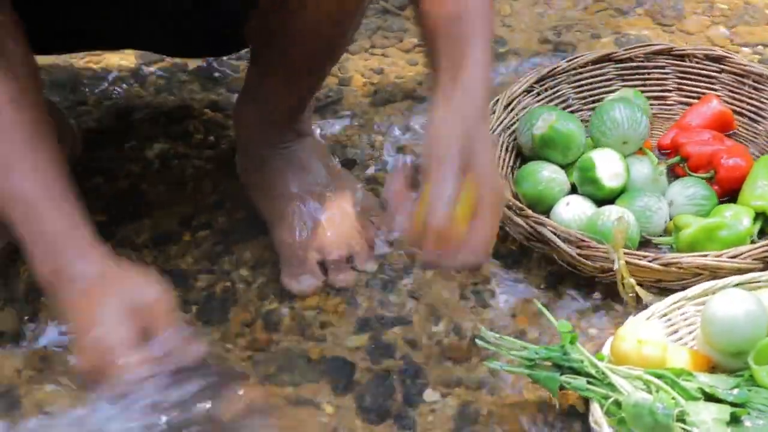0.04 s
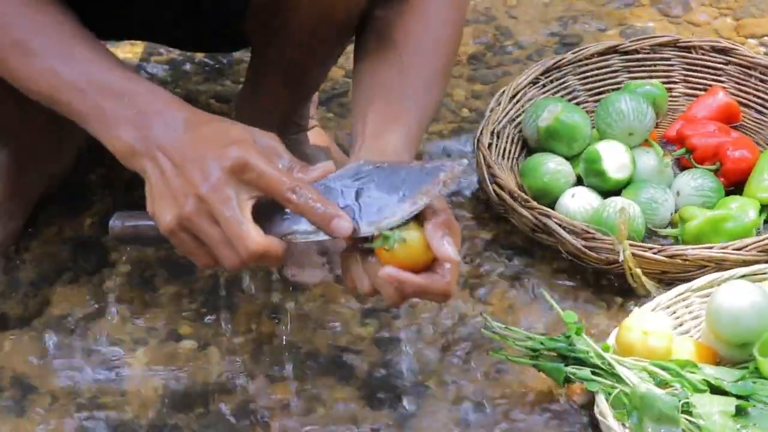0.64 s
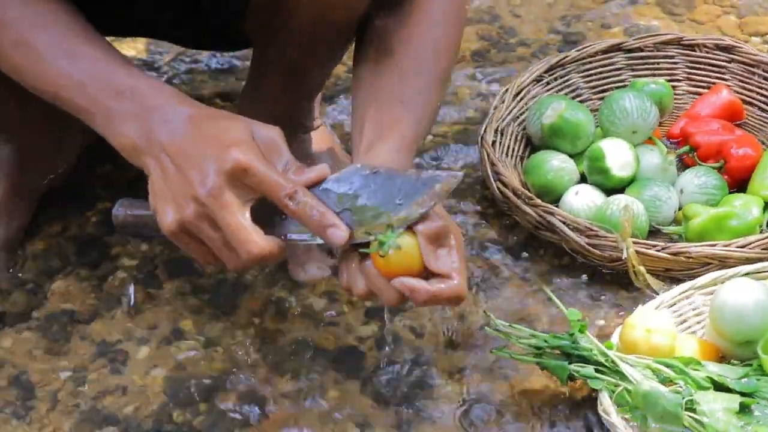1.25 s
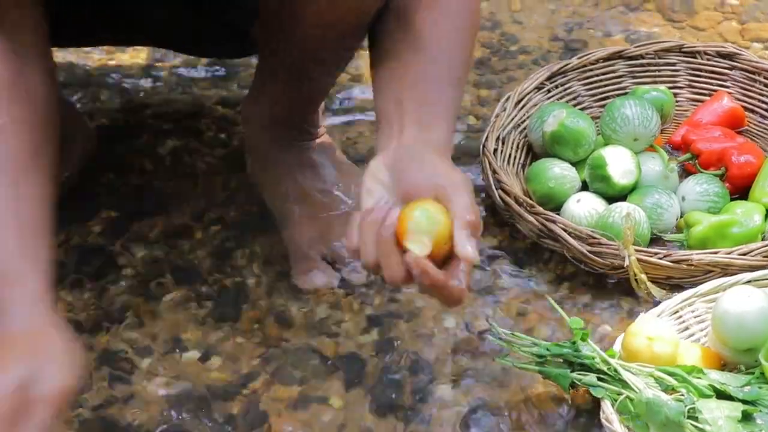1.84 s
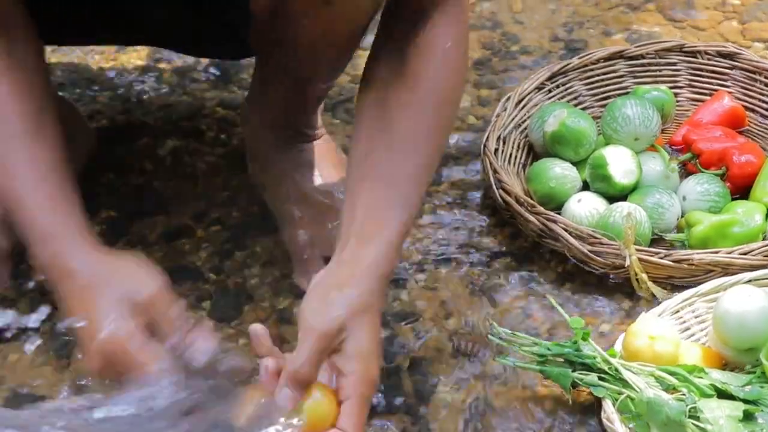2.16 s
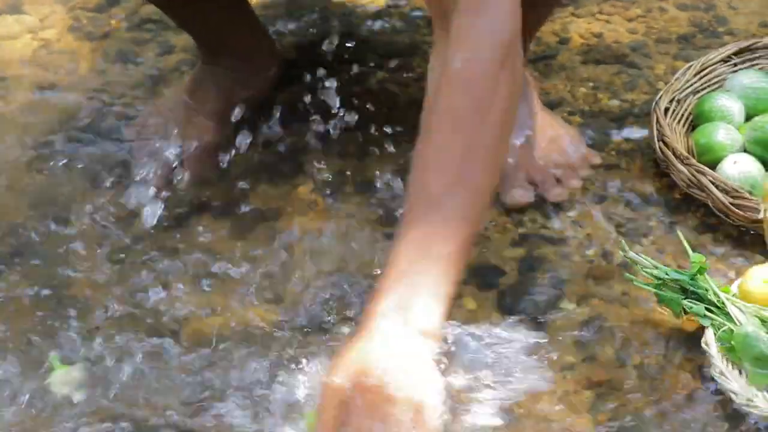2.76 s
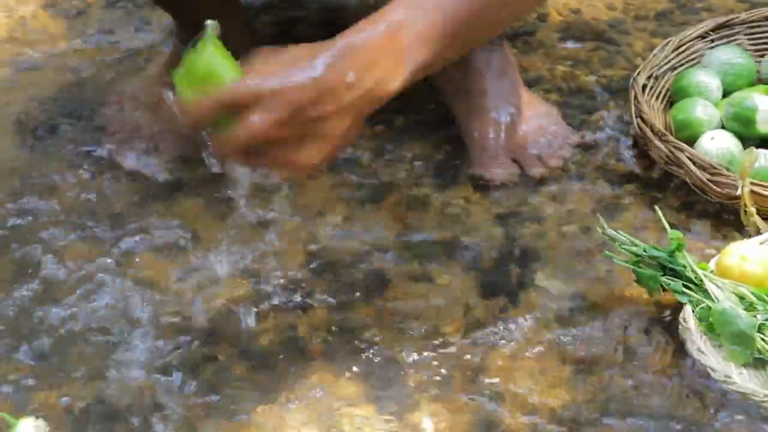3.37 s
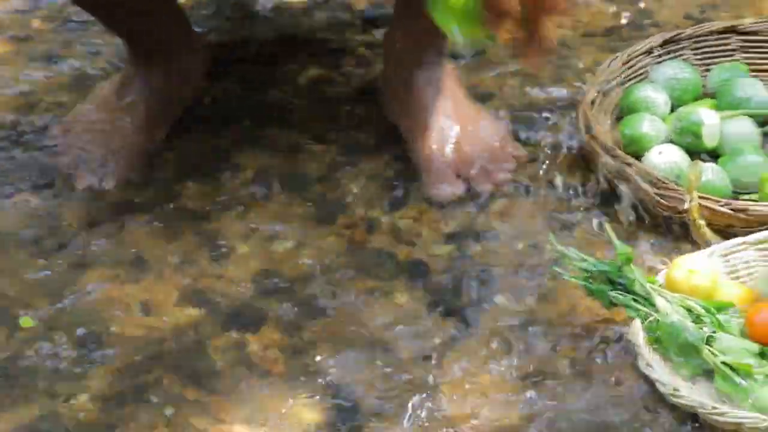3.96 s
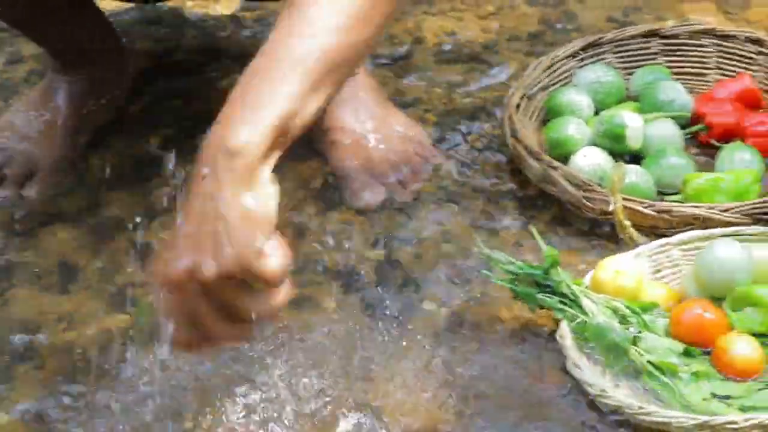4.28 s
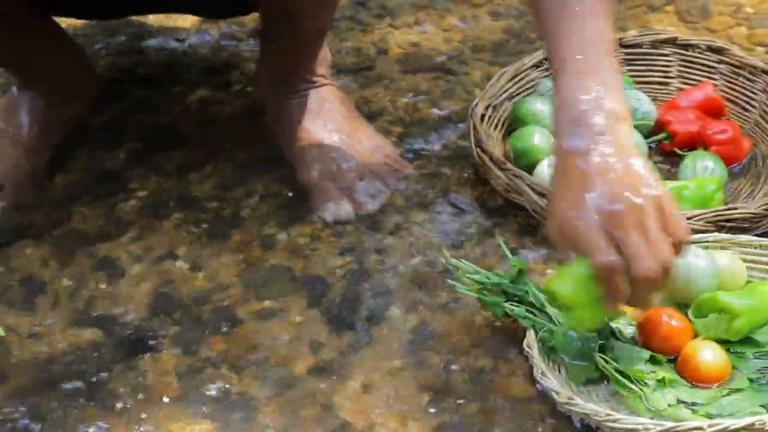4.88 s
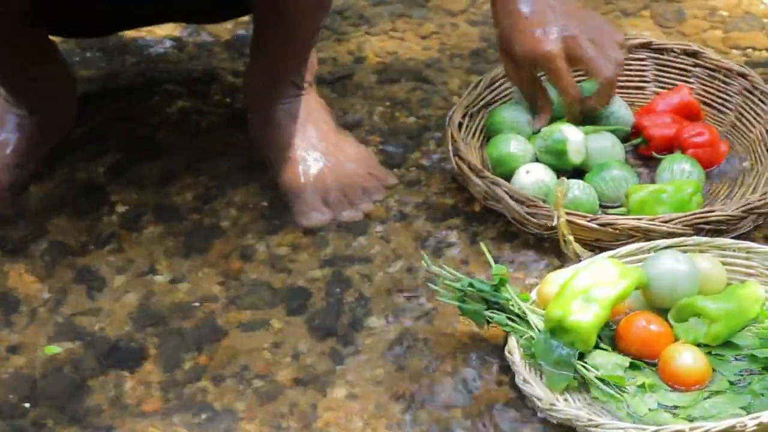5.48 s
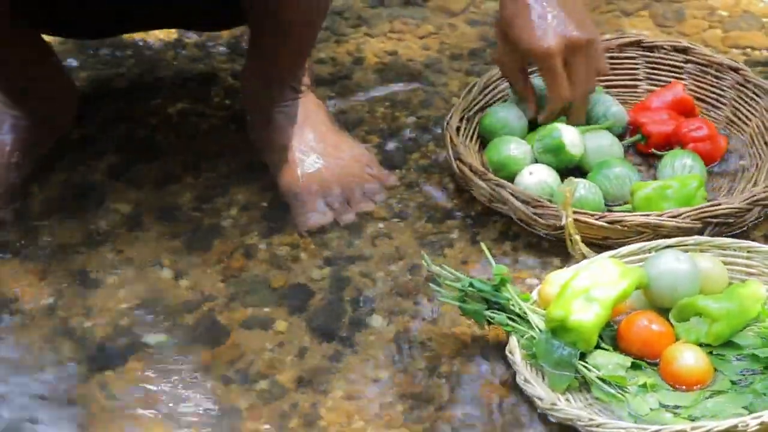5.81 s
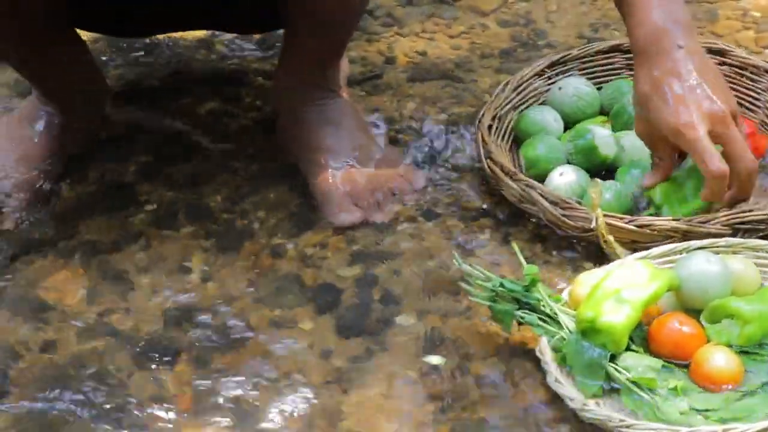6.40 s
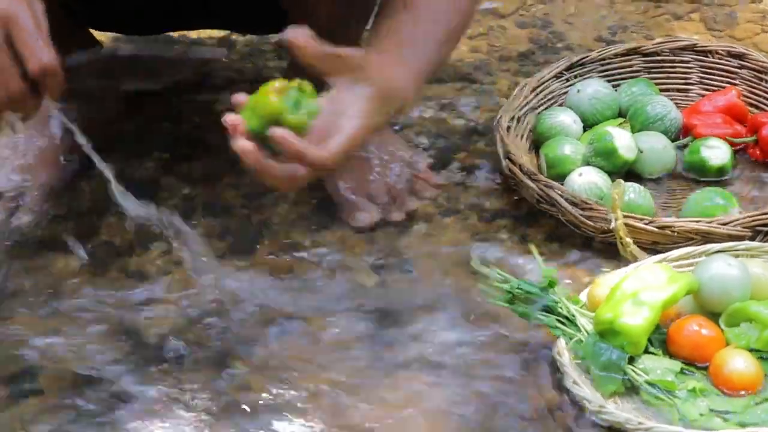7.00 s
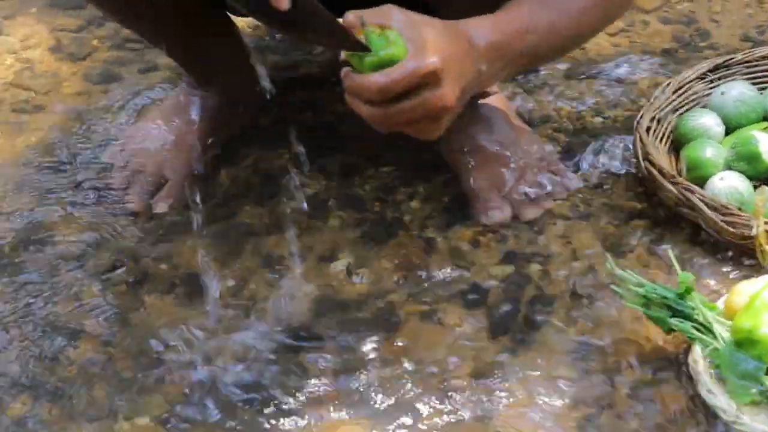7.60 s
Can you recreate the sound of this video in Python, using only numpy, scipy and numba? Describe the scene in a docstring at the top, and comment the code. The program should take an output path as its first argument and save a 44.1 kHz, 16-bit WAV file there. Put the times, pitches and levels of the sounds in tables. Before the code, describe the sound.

Close up in a shallow stream, a hand sweeps through the water, throwing up bubbles and fine spray, and a knife squeaks faintly on a tomato. Busy sloshing and slapping follow as vegetables are rinsed, then drops patter back. After a lull with faint wicker crackle come deep gulping scoops, slight squeaks of wet skins, and a last splash with drips. Water murmurs and distant insects hiss throughout, in stereo.

```python
"""A shallow stream, in stereo, close to someone who crouches in it and rinses vegetables by hand.
Water murmurs and insects hiss in the trees throughout. The first sweeps throw up ringing bubbles and
fine spray, and a knife sings faintly on a tomato. From 2 s the rinsing is busy, then drops fall back.
After a lull with fingers in the baskets, deep scoops gulp at 5.5 s; wet vegetable skins squeak faintly
under the fingers, and a last scoop at 6.7 s ends in splashing and drips."""
import sys
import numpy as np
from scipy import signal
from scipy.fft import rfft, irfft
from scipy.io import wavfile
from scipy.ndimage import uniform_filter1d
from numba import njit

SR = 44100
rng = np.random.default_rng(int(sys.argv[2]) if len(sys.argv) > 2 else 0)


def master(y):
    """Save y as 16-bit WAV."""
    cut = np.clip(np.atleast_2d(y).T, -1, 1)
    pcm = np.round(cut * 32767)  # scale
    wavfile.write(sys.argv[1], SR, pcm.astype(np.int16))


N = 337365
TIME = np.arange(N) / SR
BINS_HZ = np.maximum(np.fft.rfftfreq(N, 1 / SR), 1)


def from_db(db):
    """Decibels to gain."""
    return 10 ** (np.asarray(db) / 20)


def rms_one(x):
    """Scale to unit power."""
    return x / np.sqrt(np.mean(x ** 2) + 1e-20)


def at_hz(points, hz):
    """Read a curve on a log-frequency axis."""
    point_hz, value = np.transpose(points)
    return np.interp(np.log(hz), np.log(point_hz), value)


def drift(rate_hz):
    """Random wander of rms 1, mostly slower than rate_hz."""
    return rms_one(irfft(rfft(rng.standard_normal(N)) / (1 + (BINS_HZ / rate_hz) ** 2), N))


def wide_noise(spectrum):
    """Steady noise from all around the microphone, more alike in the bass; its mid has rms 1."""
    # likeness of left and right: frequency_hz, correlation
    likeness = [(50, 0.72), (150, 0.23), (400, 0.42), (800, 0), (1500, 0), (16000, 0.02)]
    alike = at_hz(likeness, BINS_HZ)
    mid, side = rfft(rng.standard_normal((2, N))) * from_db(at_hz(spectrum, BINS_HZ))
    mid, side = irfft(mid * np.sqrt(1 + alike), N), irfft(side * np.sqrt(1 - alike), N)
    return np.array([mid + side, mid - side]) / mid.std()


def bubble_t60(hz):
    """Seconds a bubble rings: small ones ring higher and die sooner."""
    return 0.037 * (1000 / hz) ** 0.43


def tick_t60(hz):
    """Seconds an impact rings: high ones die sooner."""
    return 0.0057 * (1000 / hz) ** 0.22


@njit
def add_rings(out, start, hz, height, t60, rise, sr):
    """Damped sines that build up within a cycle and climb in pitch by the share `rise` as they die."""
    for k in range(len(start)):
        first = int(start[k] * sr) + 1
        for i in range(max(first, 0), min(first + int(t60[k] * sr), len(out))):
            age = i / sr - start[k]
            cycles = hz[k] * age * (1 + rise[k] * age / (2 * t60[k]))
            envelope = np.exp(-6.9 * age / t60[k]) * (1 - np.exp(-2.5 * cycles))
            out[i] += height[k] * envelope * np.sin(2 * np.pi * cycles)


def rings(start, hz, height, t60, scatter_db, lag_s, rise=0.0):
    """Each ring reaches the microphone from its own spot, with its own balance and arrival lag."""
    # balance of the near water: frequency_hz, left_minus_right_db
    lean = [(300, 2), (1200, -0.5), (2400, -4), (4500, 0), (8000, -3), (13000, -6)]
    place, lag = rng.standard_normal((len(start), 2)).T
    pan_db = at_hz(lean, hz) + scatter_db * place
    heard = np.abs(height) > 1e-4
    out = np.zeros((2, N))
    for channel, sign in zip(out, (1, -1)):
        arrival = start + sign * lag * lag_s / 2
        columns = np.broadcast_arrays(arrival, hz, height * from_db(sign * pan_db / 2), t60, rise)
        add_rings(channel, *(column[heard] for column in columns), float(SR))
    return out


def swarm(colour, spread_db, count):
    """Random grains (start_s, pitch_hz, signed size), few of them large; colour is pitch_hz, level_db."""
    when, pitch, chance, sign = rng.random((count, 4)).T
    hz = colour[0][0] * (colour[-1][0] / colour[0][0]) ** pitch
    size = rms_one(from_db(spread_db * np.minimum(-np.log(1 - chance), 4)))
    size *= np.sign(sign - .5) * np.sqrt(hz / count)   # equal power per Hz before colouring
    return when * N / SR, hz, size * from_db(at_hz(colour, hz))


def insects(level_db=-42, left_lean_db=3.0, shimmer_db=1.0):
    """A chorus far off in the trees: a shimmering hiss, stronger on the left."""
    # spectrum of the chorus: frequency_hz, relative_db
    spectrum = [(3500, -39), (4300, -15), (4900, -9.5), (6300, -4.5), (7100, 0), (8000, 1), (8600, -2),
                (9200, -11.5), (10000, -17), (10800, -23.5), (13000, -28), (16000, -36)]
    level = from_db(level_db + shimmer_db * drift(39))
    return level * wide_noise(spectrum) * from_db([[left_lean_db / 2], [-left_lean_db / 2]])


def stream(level_db=-53.5):
    """Running water murmurs steadily behind everything."""
    # spectrum of the murmur: frequency_hz, relative_db
    spectrum = [(15, -36), (25, -5.5), (59, -3), (196, -5.5), (237, -5), (342, -2.5), (679, -9.5),
                (897, -9), (1110, -9), (1240, -8), (2110, -14), (2860, -12.5), (3390, -15), (4200, -12),
                (5460, -46), (9240, -120)]
    return from_db(level_db) * wide_noise(spectrum)


def spits(level_db=-44):
    """Now and then the riffles spit a tiny droplet, a faint tick at the very top."""
    s, hz, size = swarm([(9000, 0), (11500, 0), (14500, -3)], spread_db=2.5, count=70)
    return rings(s, hz, from_db(level_db) * rms_one(size), tick_t60(hz) / 2, scatter_db=5.0, lag_s=6e-5)


def bank_echo(near, wet_db=-12.0, t60_s=.12):
    """Legs, stones and banks add a brief echo to the near sound, different on each side."""
    age = TIME[:SR // 3]
    echo = rng.standard_normal((2, len(age))) * from_db(-60 * age / t60_s) * (age > .002)
    echo /= np.sqrt(np.sum(echo ** 2, axis=1, keepdims=True))
    return near + from_db(wet_db) * signal.fftconvolve(near, echo, axes=1)[:, :N]


def basket_handling(gain_db=-3.5, t60_s=.005):
    """Wicker and wet skins crackle faintly under the fingers."""
    # touches among the vegetables in the baskets: middle_s, half_length_s, level_db
    touches = [(5.026, 0.01, -49), (5.113, 0.022, -57), (6.2, 0.049, -55), (6.514, 0.031, -48),
               (6.651, 0.027, -49)]
    s, hz, size = swarm([(450, -1), (1800, 1), (2800, 0), (4000, -8)], spread_db=2.0, count=7000)
    touch = sum(from_db(db) * np.exp(-((s - middle) / half) ** 2 / 2) for middle, half, db in touches)
    height = from_db(gain_db) * size * touch / np.sqrt(t60_s)
    return rings(s, hz, height, t60_s, scatter_db=7.0, lag_s=3e-5)


def squeaks():
    """Stick and slip keep a thin note going while its phase wanders; the wider, the raspier."""
    # the knife blade and wet skins sing faintly when rubbed:
    # middle_s, half_length_s, pitch_hz, width_hz, level_db
    rubs = [(0.403, 0.017, 4140, 101, -37), (0.414, 0.021, 2570, 100, -39.5),
            (1.037, 0.041, 2710, 30.2, -46.5), (1.135, .035, 2680, 35.2, -56),
            (1.643, 0.046, 2690, 44.6, -44), (6.464, 0.063, 2570, 110, -44),
            (6.565, 0.073, 2840, 50.3, -50), (6.627, 0.083, 2470, 111.3, -49)]
    out = np.zeros((2, N))
    for middle, half, hz, width_hz, db in rubs:
        near = np.abs(TIME - middle) < 4 * half
        wander = np.cumsum(rng.standard_normal((2, N)), axis=1) * np.sqrt(2 * np.pi * width_hz / SR)
        phase = 2 * np.pi * hz * TIME[near] + uniform_filter1d(wander[:, near], size=60)
        envelope = from_db(db) * np.exp(-((TIME[near] - middle) / half) ** 2 / 2)
        out[:, near] += envelope * np.sqrt(2) * np.sin(phase)
    return out


def splashes():
    """Strokes, slaps and showers in one list, all with the columns of the strokes."""
    # hand and knife sweeping through the water:
    # crest_s, swell_s, fade_s, level_db, biggest_bubble_hz, spray_relative_db
    strokes = [(0.19, 0.045, 0.03, -32.5, 1010, -31), (0.229, 0.024, 0.028, -29, 180, -27),
               (0.315, 0.053, 0.046, -22, 1440, -29.5), (0.383, 0.015, 0.1, -37, 920, -19.5),
               (1.585, 0.005, 0.028, -37.5, 1700, -11), (2.2, 0.081, 0.043, -37.5, 620, -27),
               (2.266, 0.007, 0.016, -22.5, 332, -27.5), (2.313, .028, 0.043, -25.5, 412, -31.5),
               (2.426, 0.019, 0.031, -24, 248, -36), (2.529, 0.056, .045, -23, 1340, -29.5),
               (2.59, 0.062, 0.089, -27, 278, -30.5), (2.742, .022, .02, -23, 595, -28.5),
               (2.823, 0.038, 0.021, -27, 1610, -25), (2.885, .045, 0.084, -23.5, 447, -31),
               (3.045, 0.026, 0.046, -28.5, 280, -34), (3.13, .05, 0.048, -25.5, 890, -27.5),
               (4.338, 0.017, .02, -46, 1130, -8.5), (5.53, 0.037, 0.13, -37, 320, -35),
               (5.735, 0.073, 0.017, -39, 400, -35), (5.828, 0.052, 0.12, -33, 466, -36),
               (6.718, 0.013, 0.028, -33.5, 441, -49), (6.77, .03, .03, -40, 700, -36),
               (6.94, 0.095, 0.068, -33.5, 580, -38), (7.06, 0.12, 0.058, -26, 1340, -25)]
    # flat smacks on the surface: crest_s, level_db, biggest_bubble_hz
    slaps = [(0.277, -15, 610), (0.32, -27, 900), (0.595, -29, 220), (2.086, -20.5, 1310),
             (2.667, -20.5, 384), (3.931, -20, 1870), (5.501, -27, 597), (6.716, -41, 780)]
    # water falling back from lifted hands: landing_s, fade_s, level_db, spray_relative_db
    showers = [(0.026, .14, -42, -29), (0.604, 0.071, -36, -23), (0.74, .025, -42, -22),
               (1.981, 0.036, -40, -20), (2.019, 0.019, -31.5, -33), (2.13, 0.02, -27.5, -33),
               (3.22, 0.079, -34, -29), (3.363, 0.27, -38.5, -27.5), (3.61, 0.066, -29.5, -27),
               (3.737, 0.24, -47, -16), (3.841, .014, -36.5, -20.5), (3.888, 0.01, -42, -12),
               (3.966, 0.025, -36.5, -34), (4.661, 0.027, -41.5, -19), (7.187, 0.037, -38.5, -22),
               (7.525, 0.035, -39, -20)]
    return (strokes
            + [(s, .002, .0038, db, hz, -33.5) for s, db, hz in slaps]
            + [(s, .006, fade, db, 1580, spray_db) for s, fade, db, spray_db in showers])


def stirring(s, hz, airborne=False):
    """How hard the splashes drive bubbles, or airborne spray, at given moments and pitches."""
    power = 0
    for crest, swell, fade, db, biggest_bubble_hz, spray_db in splashes():
        envelope = np.exp(-np.maximum((crest - s) / swell, (s - crest) / fade))
        share = from_db(spray_db) ** 2 if airborne else 1 / (1 + (biggest_bubble_hz / hz) ** 5)
        power = power + share * (from_db(db) * envelope) ** 2
    return np.sqrt(power)


def patter(gain_db=-16, dripping_db=-56, t60_s=.0008):
    """Heavier flung drops land as pitchless clicks; wet hands keep dripping between splashes."""
    s, hz, size = swarm([(2500, 0), (6000, 0), (11000, -5)], spread_db=4.0, count=1000)
    drive = stirring(s, hz, airborne=True) + from_db(dripping_db)
    height = from_db(gain_db) * size * drive / np.sqrt(t60_s)
    return rings(s, hz, height, t60_s, scatter_db=5.0, lag_s=6e-5)


def spray(gain_db=-5.0, t60_s=.002):
    """Fine droplets crackle on the surface all round the microphone."""
    # spectrum of the droplets: pitch_hz, relative_db
    colour = [(3000, 12), (5000, 9), (8000, 15.5), (10000, 10.5), (12000, 1), (16000, -5)]
    s, hz, size = swarm(colour, spread_db=4.0, count=30000)
    height = from_db(gain_db) * size * stirring(s, hz, airborne=True) / np.sqrt(t60_s)
    return rings(s, hz, height, t60_s, scatter_db=7.0, lag_s=1e-4)


def ticks(crack_db=-1.5, crack_hz=6000.0, crack_t60_s=0.00088, soft_hz=1500):
    """Hard little impacts: a bright crack and hardly any ring; low, soft ones crack less."""
    # knocks of drops, knife and basket: start_s, pitch_hz, level_db
    knocks = [(0.2748, 2520, -10), (.279, 1690, -6), (0.597, 3300, -17.5), (.765, 3550, -24),
              (1.023, 3880, -21), (1.584, 5500, -25), (1.586, 1930, -28), (1.979, 3420, -27),
              (2.021, 4330, -25), (2.147, 4500, -19), (2.316, 8350, -10), (2.51, 3520, -20),
              (2.666, 2500, -26), (2.734, 2600, -8.5), (2.821, 2780, -11.5), (3.457, 2320, -25),
              (3.734, 4150, -16), (3.812, 8400, -17), (3.843, 2740, -16), (3.888, 3700, -19),
              (4.165, 3600, -29), (4.657, 3920, -24), (4.965, 2680, -31), (5.434, 11400, -28),
              (5.503, 1210, -14), (6.198, 2850, -26), (6.231, 274, -13.5), (6.716, 970, -1),
              (6.824, 11500, -25), (6.87, 3180, -15), (6.921, 2420, -17), (6.995, 12100, -7)]
    s, hz, db = np.transpose(knocks)
    ring = rings(s, hz, from_db(db), tick_t60(hz), scatter_db=1.5, lag_s=8e-6)
    crack_height = from_db(db + crack_db) / (1 + (soft_hz / hz) ** 2)
    return ring + rings(s, crack_hz, crack_height, crack_t60_s, scatter_db=-2.0, lag_s=2e-5)


def gulps(gain_db=-2.5, flutter_db=3.0, wobble=.08, froth=0.29):
    """The hollow behind the hand booms low while deep and rises as it closes; its walls flutter."""
    # air pockets opened by deep scoops, one curve each: time_s, pitch_hz, level_db
    pockets = [
        [(5.505, 329.6, -46), (5.525, 341, -26), (5.545, 514, -34), (5.555, 484, -48), (5.6, 420, -28),
         (5.62, 450, -40), (5.65, 420, -40)],
        [(5.652, 403, -35), (5.664, 208.5, -25), (5.7, 216.5, -25.5), (5.72, 200, -46), (5.755, 191, -33),
         (5.775, 315, -37), (5.8, 491, -27), (5.83, 485, -53)],
        [(6.745, 340, -28), (6.76, 321, -35), (6.78, 311, -40), (6.8, 253, -37), (6.835, 343, -28.5),
         (6.86, 378, -39), (6.89, 418, -37.5), (6.95, 435, -51)],
    ]
    flutter = from_db(flutter_db * drift(60))
    bend = 1 + wobble * drift(70.4)
    out = np.zeros(N)
    for curve in pockets:
        s, hz, db = np.transpose(curve)
        level = uniform_filter1d(np.interp(TIME, s, from_db(db), left=0, right=0), size=400)
        pitch_hz = np.interp(TIME, s, hz) * bend
        out += level * np.sin(2 * np.pi * np.cumsum(pitch_hz) / SR)
    return from_db(gain_db) * out * flutter * (1 + froth * drift(260))


def plops(gain_db=4.5, lingering=0.63):
    """Large single bubbles, each a short note; those that climb to the surface glide up and linger."""
    # bubbles big enough to stand out: start_s, pitch_hz, level_db, pitch_rise_share
    bubbles = [(0.023, 833, -35.5, 0.085), (0.055, 1050, -38.5, 0.61), (0.091, 1740, -36, 0.18),
               (0.12, 2300, -30.5, .15), (0.142, 1120, -33, 0.3), (0.176, 970, -30.5, 1),
               (0.197, 900, -34, .7), (0.319, 1034, -25.5, 0), (0.387, 1250, -29, 0.15),
               (0.476, 2520, -29.5, 0.2), (0.486, 976, -23, 1), (0.595, 382, -36, 0.085),
               (0.604, 1220, -33, 0.089), (0.676, 1790, -37.5, 0.16), (0.735, 1150, -36.5, 0.92),
               (1.982, 1404, -36.5, 0.9), (2.083, 2810, -26.5, 0.098), (2.31, 880, -21.5, 0),
               (2.355, 412, -21.5, 0.41), (2.425, 677, -23, 0.39), (2.444, 1250, -26.5, 0.52),
               (2.526, 1090, -27.5, 0), (2.598, 530, -27, 0.029), (2.731, 1250, -23, 0),
               (2.756, 1205, -22, 1), (2.866, 396, -25.5, 0.35), (2.887, 662, -27, 0.59),
               (2.984, 1645, -23.5, 0), (3.019, 626, -28, 0.81), (3.021, 484, -27, 0.23),
               (3.109, 1400, -22, 0.52), (3.152, 1425, -19, 0), (3.251, 2760, -30.5, 0.67),
               (3.356, 2460, -31.5, 0.47), (3.455, 1260, -34, 0), (3.577, 1650, -36.5, 0.18),
               (3.646, 1210, -29, 1), (3.653, 2800, -26, 0.059), (3.842, 1600, -30, 0.11),
               (3.88, 3930, -32, 0.19), (3.987, 1340, -35, 0), (3.985, 2760, -32, 0.069),
               (4.641, 2590, -30, 0.18), (4.68, 1910, -44, .1), (4.807, 1203, -35.5, 0),
               (4.829, 2110, -42, 0), (4.927, 2440, -41, 0.92), (5.5, 354, -21, 0),
               (5.71, 1146, -28.5, .05), (5.74, 2030, -34.5, 0.93), (5.843, 2150, -28, 0.55),
               (5.894, 2540, -31, 0.00016), (5.918, 700, -35, .3), (6.017, 2210, -37, 0.9),
               (6.699, 2280, -26.5, 0.94), (6.705, 1004, -21, 0.041), (6.712, 1435, -16, 0.66),
               (6.741, 356, -21.5, 0), (6.878, 1906, -18, 0), (7.056, 1330, -23, 0.12),
               (7.101, 2570, -25.5, 0)]
    s, hz, db, rise = np.transpose(bubbles)
    t60 = bubble_t60(hz) * (1 + lingering * rise)
    return rings(s, hz, from_db(db + gain_db), t60, scatter_db=4.0, lag_s=2e-5, rise=rise)


def gurgle(gain_db=-13.0, max_rise=.7):
    """Middling bubbles break loose at random whenever the water is stirred."""
    s, hz, size = swarm([(330, 4.5), (1200, 3), (1700, -1.5), (2400, -2.5)], spread_db=2.0, count=700)
    t60 = bubble_t60(hz) * 2 ** rng.uniform(-.5, .7, len(s))
    height = from_db(gain_db) * size * stirring(s, hz) / np.sqrt(t60)
    rise = max_rise * rng.random(len(s)) ** 2
    return rings(s, hz, height, t60, scatter_db=3.5, lag_s=3e-5, rise=rise)


def churn(gain_db=-13.5, t60_at_2khz_s=0.0039):
    """Tearing sheets of water: countless dead little bursts that fill in between the bubbles."""
    colour = [(450, -18.0), (900, -13), (2000, 5.0), (3200, 2.5), (4400, -36), (6000, -38)]
    s, hz, size = swarm(colour, spread_db=2.5, count=24000)
    height = from_db(gain_db) * size * stirring(s, hz) / np.sqrt(t60_at_2khz_s)
    return rings(s, hz, height, t60_at_2khz_s * np.sqrt(2000 / hz), scatter_db=-0.5, lag_s=4e-5)


def bubble_cloud(gain_db=-11, clump_db=2.5, max_rise=1.447):
    """The hand churns air in by clumps: big bubbles ring low and long, small ones high and briefly."""
    # spectrum of the cloud: pitch_hz, relative_db
    colour = [(150, -24), (400, 7), (1000, 5.5), (2000, -0.5), (3200, 3.5), (4200, -12), (6000, -9.5),
              (9000, -37)]
    s, hz, size = swarm(colour, spread_db=4.0, count=38000)
    t60 = 0.0366 * (1000 / hz) ** .7 * 2 ** rng.uniform(-1.8, 1, len(s))
    clumps = from_db(clump_db * np.interp(s, TIME, drift(45)))
    height = from_db(gain_db) * size * clumps * stirring(s, hz) / np.sqrt(t60)
    rise = rng.uniform(0, max_rise, len(s))
    return rings(s, hz, height, t60, scatter_db=-0.5, lag_s=4e-5, rise=rise)


def scene(lowest_hz=140):
    """Water close to the microphone, which radiates no deep bass, in front of the far surroundings."""
    water = bubble_cloud() + churn() + spray() + patter() + plops() + gurgle() + ticks() + gulps()
    water = signal.sosfilt(signal.butter(4, lowest_hz, "high", fs=SR, output="sos"), water)
    return bank_echo(water + basket_handling()) + squeaks() + spits() + insects() + stream()


def record(dry):
    """The sound drops out for an instant, and the highest treble is cut off steeply."""
    gap_start_s, gap_end_s, cutoff_hz = 2.223, 2.251, 15900
    live = (TIME < gap_start_s) | (TIME > gap_end_s)
    return signal.sosfilt(signal.ellip(10, .1, 70, cutoff_hz, fs=SR, output="sos"), dry * live)


dry = scene()
out = record(dry)
master(out)
```